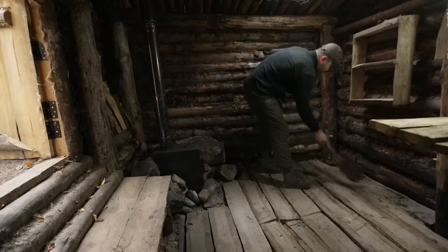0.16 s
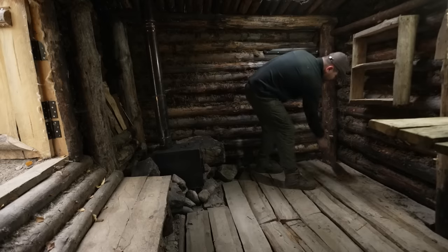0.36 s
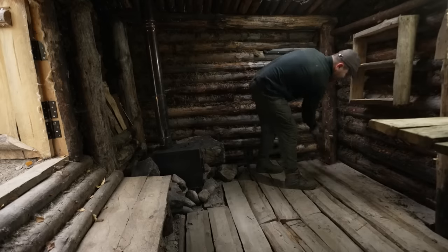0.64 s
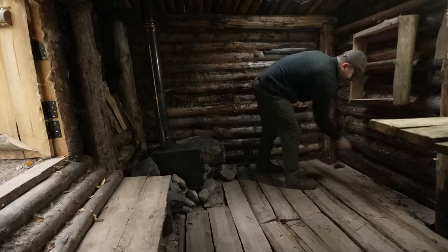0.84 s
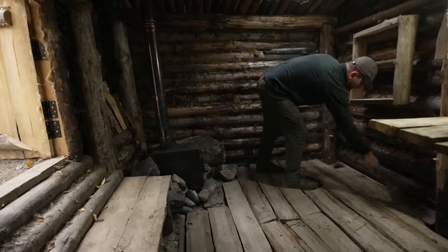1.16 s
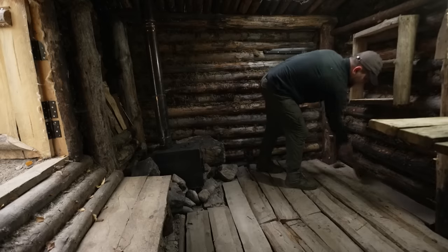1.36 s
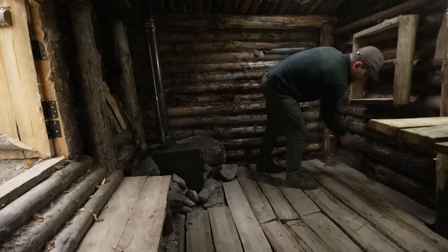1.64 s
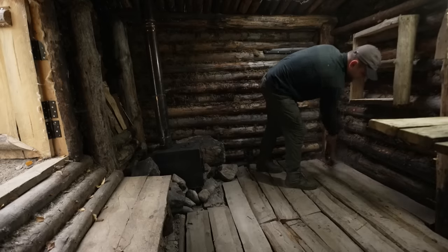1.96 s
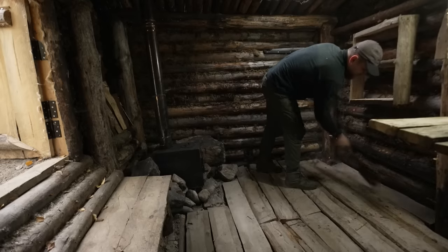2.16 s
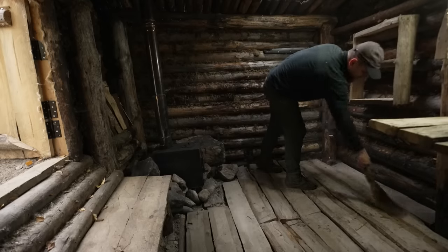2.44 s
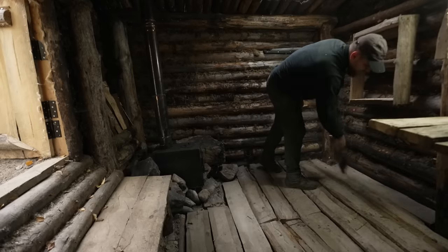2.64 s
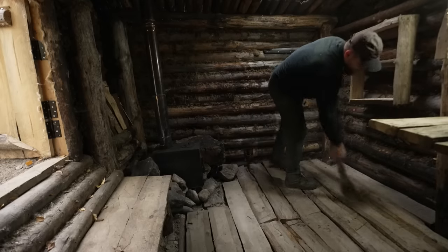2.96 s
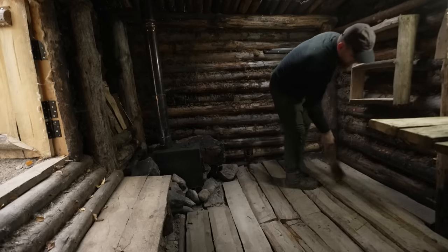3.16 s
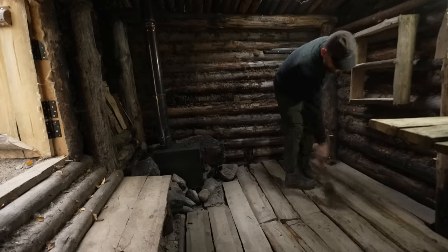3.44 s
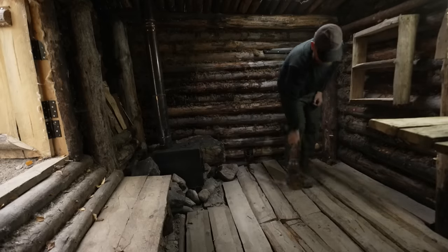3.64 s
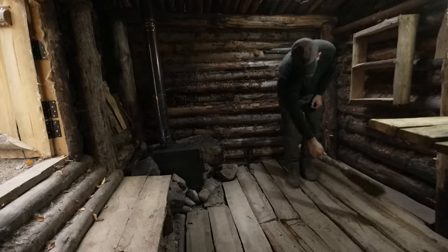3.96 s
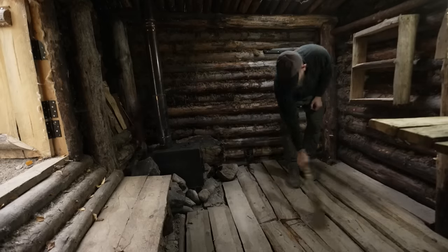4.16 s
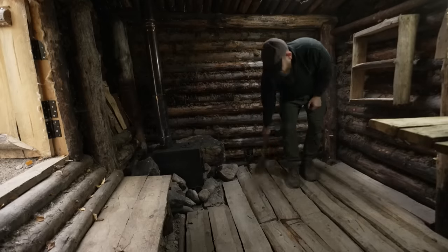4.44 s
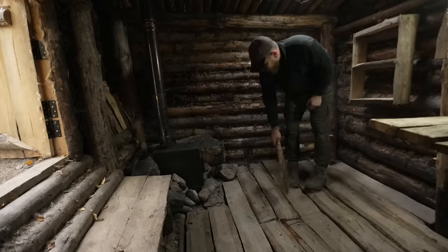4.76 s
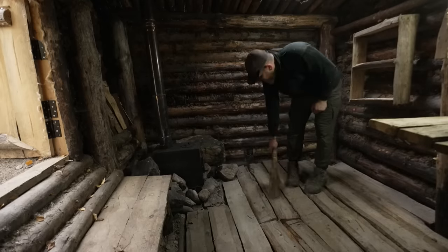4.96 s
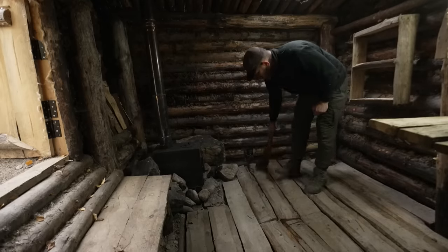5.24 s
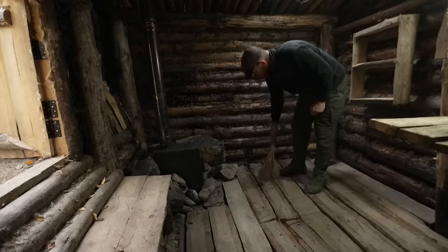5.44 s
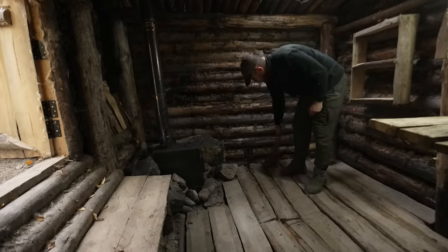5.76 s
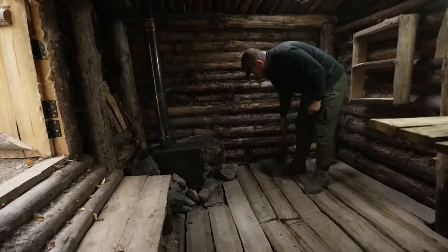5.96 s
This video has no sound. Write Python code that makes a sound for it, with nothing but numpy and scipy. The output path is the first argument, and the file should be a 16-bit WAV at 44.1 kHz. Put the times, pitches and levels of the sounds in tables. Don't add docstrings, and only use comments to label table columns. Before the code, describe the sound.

Close in a small log shelter, boots and a broom handle knock hollow floorboards, then a straw hand broom sweeps in brisk, irregular strokes. Straws crackle, stems snap, grit ticks and soles scuff between passes. A sharp cluster of cracks comes midway and a harder knock late. Low wind rumbles throughout over faint hiss; one close microphone, essentially mono, with a short woody room.

```python
import sys
import numpy as np
from scipy import signal
from scipy.fft import rfft, irfft
from scipy.io import wavfile

SR = 44100
rng = np.random.default_rng(int(sys.argv[2]) if len(sys.argv) > 2 else 0)


def rack_gain(trim_db):
    fader = np.asarray(trim_db, float)
    return 10 ** (fader / 20)


def log_audio(samples):
    frames = np.atleast_2d(samples).T
    limited = np.clip(frames, -1, 1)
    pcm = np.round(limited * 32767).astype(np.int16)
    wavfile.write(sys.argv[1], SR, pcm)


N = 268745


def evened(x):
    return x / np.sqrt(np.mean(x ** 2) + 1e-20)


def read(points, hz):
    f, value = np.transpose(points)
    return np.interp(np.log(hz + 1), np.log(f + 1), value)


def add(mix, s, sound):
    part = mix[round(s * SR):][:len(sound)]
    part += sound[:len(part)]


def coloured(points):
    hz = np.fft.rfftfreq(N, 1 / SR)
    spectrum = rfft(rng.standard_normal(N)) * rack_gain(read(points, hz))
    return evened(irfft(spectrum, N))


def wander(per_s):
    knots = rng.standard_normal(2000)
    return np.interp(np.arange(N) / SR * per_s, np.arange(2000), knots)


def slips(per_s, spread_db, size=30000):
    place, kept, big, sign = rng.random((4, size))
    height = rack_gain(spread_db * np.minimum(-np.log(big + 1e-9), 4)) * np.sign(sign - 0.5)
    height *= kept < per_s * N / SR / size
    return evened(np.bincount((place * N).astype(int), height, N))


def ring(modes, t):
    return sum(rack_gain(db - 60 * t / t60) * np.sin(2 * np.pi * hz * t) for hz, db, t60 in modes)


def broom(count=30):
    # [f/Hz, level/dB]
    straw_colour = [(380, -12), (600, -9.5), (1000, -5), (2000, -0.5), (4000, 2.5), (7000, 2), (11000, 2.5),
                    (13500, -2), (15500, -4)]
    # [f/Hz, level/dB, t60/s]
    plank_modes = [(340.7, 7, 0.067), (490, -1.5, 0.068), (560, -1.5, 0.044), (795, 4, 0.042),
                   (938, -9, 0.13)]
    boards_hz, stems_hz, tips_hz = 600, 2860, 9200
    s = np.arange(0, N, 64) / SR
    t, u = np.arange(N) / SR, np.arange(SR // 10) / SR
    parts_db = contact(s)
    stems_db = parts_db[1] - parts_db[2]
    places = np.log([boards_hz, stems_hz, tips_hz])
    tufts, judder_db = slips(900, 2.8), 0.72 * wander(110)

    plank = ring(plank_modes, u) * np.minimum(u / 0.0046, 1)
    push = rack_gain(np.interp(t, s, parts_db[0]) - 5.5 + 3.1 * wander(30)) * slips(1200, 2.0)
    out = signal.oaconvolve(push, plank / np.linalg.norm(plank))[:N]

    u = u[:1500]
    for hz in np.geomspace(380, 15700, count):
        shares = [np.interp(np.log(hz), places, one) for one in np.eye(3)]
        level_db = np.interp(t, s, shares @ parts_db) + read(straw_colour, hz)
        level_db += judder_db + 2.0 * wander(35)
        level_db -= np.interp(t, s, stems_db) * 0.52 * max(np.log(hz / tips_hz), 0)
        straw = ring([(hz, 0, 14 / hz)], u) * np.minimum(u * hz / 2.45, 1) ** 2
        drive = 0.82 * slips(3000, 2.4) + 0.5 * tufts
        out += signal.oaconvolve(rack_gain(level_db) * drive, straw / np.linalg.norm(straw))[:N]
    return rack_gain(-10.5) * out


def contact(s):
    # [landing t/s, push to full speed/s, run-out to the lift/s, tips level/dB, stems re tips/dB]
    strokes = [(0.412, 0.095, 0.04, -28.5, 0), (1.263, 0.21, 0.037, -32, 1.0),
               (1.501, 0.059, 0.076, -43.5, 1), (1.556, 0.088, 0.45, -51, 6),
               (1.62, 0.14, 0.034, -36.5, -15.5), (1.877, 0.045, 0.042, -31, -1),
               (2.467, 0.13, 0.03, -34.5, -4), (2.759, 0.052, 0.26, -64, 4), (2.979, 0.036, 0.058, -26, -6),
               (3.169, 0.034, 0.095, -43, -8.5), (3.336, 0.03, 0.067, -53, 3),
               (3.462, 0.037, 0.096, -32, -2), (3.607, 0.0098, 0.12, -41, 1.5),
               (3.773, 0.12, 0.15, -49, 0.5), (4.21, 0.21, 0.094, -30, -5.5),
               (4.549, 0.053, 0.098, -51.5, -0.5), (4.903, 0.068, 0.052, -60.5, 7),
               (5.024, 0.14, 0.13, -33, -7.5), (5.661, 0.17, 0.14, -35, -5), (5.994, 0.035, 0.074, -49, -2)]
    # [t/s, fade/s, tips level/dB, stems re tips/dB]
    flicks = [(.094, 0.043, -51.5, 2), (.254, .02, -48, 0), (.411, 0.077, -28, -10.5),
              (.571, .055, -36.5, -12), (.623, .17, -50.5, -3), (.693, 0.11, -43, -9),
              (.891, .069, -61, -16), (1.286, 0.067, -44.5, 15), (1.422, 0.12, -33.5, 10),
              (1.634, 0.049, -37, -17), (1.926, .032, -44, 16.5), (1.999, 0.12, -37, -15),
              (2.361, .025, -51.5, -1), (.381, 0.053, -50, -8), (1.227, .05, -50, 1),
              (2.097, 0.077, -50, -6), (2.158, .04, -56, -3), (2.178, .08, -58, 1), (2.21, .03, -57, -8),
              (.478, .06, -36, -8), (.51, .04, -38, -4), (3.49, 0.028, -40, -0.5), (2.462, 0.067, -48.5, 7),
              (2.716, 0.14, -43, -12.5), (2.987, 0.048, -47.5, 19.5), (3.073, 0.034, -29, -13),
              (3.514, .027, -33.5, 5), (3.599, 0.053, -30.5, 1.5), (4.064, 0.12, -47.5, -5),
              (4.707, 0.39, -55.5, 0), (4.877, 0.087, -55, -7), (5.163, .073, -45, -12),
              (5.54, .032, -56, 1), (5.7, .1, -37, -20)]
    # [t/s, fade/s, boards level/dB, stems re boards/dB]
    scuffs = [(.067, .056, -30, -18), (1.228, .15, -53, 3), (2.524, 0.064, -32, -16),
              (3.632, 0.15, -25.5, -10), (3.691, 0.026, -30, -8.5), (3.965, 0.18, -41, -5),
              (4.03, 0.11, -39, -12), (4.281, 0.16, -37.5, -22), (4.585, 0.28, -41.5, -13),
              (5.044, 0.21, -55, -18), (5.22, 0.2, -34.5, -20), (5.322, 0.012, -37.5, -3.5),
              (5.28, 0.17, -40.5, -4), (5.508, 0.31, -46, -8), (5.761, 0.52, -34.5, -16),
              (5.924, 0.18, -35.5, -7.5), (6.043, .058, -48, -19.5)]
    # [t/s, fade/s, boards level/dB, stems re boards/dB]
    skids = [
        (.204, 0.073, -29, -5),
        (1.236, 0.11, -32, -5.5),
        (3.3045, 0.082, -31.5, -9),
        (3.882, 0.027, -43, -5),
        (4.828, .055, -29.5, -12),
        (4.875, 0.048, -37, -18),
        (5.423, 0.069, -35, -7),
    ]
    # [level/dB] of boards, stems, tips
    rest_db = [-56.5, -64.5, -64]
    landing_db_per_s, lift_db_per_s = 487, 313
    touch_db_per_s, strike_db_per_s, fade_db = 814, 8000, 23
    boards_db_at_rest, boards_per_stems = -2, 0.67
    power = rack_gain(2 * np.array(rest_db))[:, None] * np.ones(len(s))

    for land, push, run_out, db, stems_db in strokes:
        top, lift = land + push, land + push + run_out
        soft_db, slow_db = 11 + 10 * push, 8.5 - 5.5 * run_out
        times = [land - 1, land, top, lift, lift + 1]
        drop_db = [soft_db + landing_db_per_s, soft_db, 0, slow_db, slow_db + lift_db_per_s]
        level_db = db - np.interp(s, times, drop_db)
        along = np.clip((s - top) / (lift - land), -1, 1)
        boards_db = boards_db_at_rest + boards_per_stems * stems_db - 4 * along
        parts_db = np.array([boards_db, stems_db - 4.5 * along, 0 * s])
        power = power + rack_gain(2 * (level_db + parts_db))

    touches = []
    for top, fade, db, stems_db in flicks:
        parts_db = [boards_db_at_rest + boards_per_stems * stems_db, stems_db, 0]
        touches.append((top, fade, db, touch_db_per_s, parts_db))
    for rows, rise in (scuffs, touch_db_per_s), (skids, strike_db_per_s):
        for top, fade, db, stems_db in rows:
            touches.append((top, fade, db, rise, [0, stems_db, stems_db - 5]))
    for top, fade, db, rise, parts_db in touches:
        level_db = db - np.maximum(rise * (top - s), fade_db * (s - top) / fade)
        power = power + rack_gain(2 * (level_db + np.array(parts_db)[:, None]))
    return 10 * np.log10(power)


def rubs():
    # [t/s, length/s, pitch f/Hz, second pitch f/Hz, level/dB]
    tuft_rubs = [(0.407, 0.02, 3850, 6600, -37), (0.492, 0.052, 3890, 3200, -43),
                 (0.682, .038, 3390, 3720, -55.5), (1.234, 0.015, 1380, 2980, -37.5),
                 (1.27, 0.04, 3550, 3000, -41.5), (1.42, 0.05, 2640, 3800, -41),
                 (1.895, 0.05, 3680, 4600, -41), (2.984, 0.022, 1400, 1700, -35.5),
                 (2.448, 0.059, 1210, 2380, -46.5), (2.978, .036, 1620, 2300, -35),
                 (2.97, 0.045, 4400, 4540, -43), (2.983, 0.028, 4410, 4600, -33.5),
                 (3.508, 0.017, 1250, 2680, -37.5), (3.493, 0.03, 3850, 5700, -35.5),
                 (3.88, 0.01, 1635, 3450, -43.5), (4.657, 0.012, 2875, 5100, -46),
                 (5.508, 0.0055, 1488, 2200, -49), (5.691, 0.032, 3090, 4030, -52)]
    # [t/s, length/s, pitch f/Hz, second pitch f/Hz, level/dB]
    drags = [(.064, 0.023, 880, 1300, -40), (.067, 0.024, 1100, 1500, -40), (0.258, 0.02, 300, 600, -35),
             (0.444, 0.14, 1000, 2200, -47.5), (1.339, 0.097, 330, 590, -44),
             (3.301, 0.024, 820, 1850, -39), (3.355, 0.03, 450, 560, -45.5), (3.595, 0.021, 490, 364, -41),
             (3.665, 0.09, 547, 775, -41), (4.015, 0.053, 600, 1330, -48.5), (4.466, 0.04, 780, 1500, -51),
             (5.425, 0.022, 560, 950, -40), (4.266, 0.06, 824, 600, -47.5), (5.798, 0.036, 1250, 1790, -44),
             (5.895, 0.074, 964, 1250, -44.5)]
    out, u = np.zeros(N), np.arange(SR // 10) / SR
    chance = rng.standard_normal((len(tuft_rubs + drags), 2, len(u)))
    for (s, length, hz, second_hz, db), (grit, spread) in zip(tuft_rubs + drags, chance):
        swell = np.sin(np.pi * np.clip(u / length, 0, 1) ** 0.43)
        drive = grit * rack_gain(8.2 * spread) * swell
        body = ring([(hz, 0, 0.045 + 9 / hz),
                     (1.045 * hz, -5, 0.026 + 9 / hz),
                     (second_hz, -3, 0.021 + 9 / second_hz),
                     (0.95 * second_hz, -7, 0.026 + 9 / second_hz)], u)
        sound = signal.fftconvolve(drive, body)
        add(out, s, rack_gain(db) * np.sqrt(length * SR) * sound / np.linalg.norm(sound))
    return out


def snaps():
    # [t/s, peak level/dB, centre f/Hz]
    straw_snaps = [(.1536, -38, 3050), (0.2035, -33.5, 2500), (0.252, -28.5, 6870), (0.637, -33, 3200),
                   (.7394, -42, 5430), (0.813, -40, 3720), (1.076, -39.5, 2660), (1.4254, -35, 3480),
                   (1.4465, -25, 2660), (1.716, -25.5, 6040), (2.091, -27, 5600), (2.356, -41, 5500),
                   (2.4563, -28.5, 4410), (3.237, -33.5, 3200), (3.295, -41, 2860), (3.5148, -19, 4170),
                   (3.5952, -18.5, 4660), (3.8835, -32, 3200), (4.3231, -23, 4000), (4.3345, -33, 5500),
                   (4.6562, -31, 4500), (4.706, -34.5, 8000), (4.8285, -38, 6000), (4.874, -32, 7000),
                   (4.8825, -37, 7640), (5.16, -24, 6650), (5.427, -53, 3630), (5.5764, -39, 6240)]
    # [t/s, peak level/dB, centre f/Hz]
    fine_grit = [(1.9938, -32, 9000), (2.0053, -23, 7000), (2.172, -44, 12000), (2.0262, -28, 12000),
                 (2.009, -25, 10000), (2.2064, -49, 8890), (2.4294, -47, 11500), (2.7064, -39, 12600),
                 (2.7142, -31, 11500), (2.7214, -35, 9560), (2.809, -36, 13000), (2.834, -38, 9200),
                 (3.0294, -31, 8000), (3.072, -31, 7150), (3.187, -25.5, 8000), (3.163, -38, 13000),
                 (3.178, -32, 11000), (3.2614, -32, 9520), (3.7244, -26.5, 9740), (3.8202, -36, 7690),
                 (4.3774, -23, 8000), (5.4, -38, 10500), (5.5348, -41, 8650)]
    out, t = np.zeros(N), np.arange(SR // 10) / SR
    chance = rng.standard_normal((len(straw_snaps + fine_grit), len(t)))
    for (s, db, hz), grit in zip(straw_snaps + fine_grit, chance):
        crack = np.sign(grit) * rack_gain(-60 * t / 0.0026)
        spray = rack_gain(-7.5 - 60 * t / 0.063) * grit
        colour = signal.butter(2, [0.44 * hz, min(1.52 * hz, 17000)], "band", fs=SR)
        sound = signal.lfilter(*colour, crack + spray)
        add(out, s, rack_gain(db) * sound / abs(sound).max())
    return out


def breaks():
    # [t/s, peak level/dB, lowest f/Hz, ring f/Hz, ring re crack/dB]
    stem_breaks = [(2.0907, -25, 3700, 3860, -7), (2.0912, -27, 8000, 12500, -3),
                   (.407, -21, 2500, 3840, 0), (.4105, -28, 3000, 4400, -2), (1.2345, -30, 1100, 3000, 0),
                   (1.2365, -27.5, 790, 2200, -2), (3.5952, -20, 5000, 7400, -8),
                   (3.509, -23, 2800, 5800, -2), (2.1715, -32, 9700, 12400, -12),
                   (2.1797, -46, 1500, 4300, -8), (2.7142, -33, 8800, 11500, -10.5),
                   (3.4882, -27, 2900, 4000, -6), (3.5152, -14.5, 2210, 3980, -2),
                   (3.5955, -14, 1400, 5000, -10), (4.3243, -22, 2800, 4600, -8),
                   (4.387, -22, 3000, 7000, -8), (4.7056, -39, 2700, 3600, -4),
                   (4.8738, -35, 3500, 4100, -16), (4.6563, -25, 1400, 4600, -8),
                   (4.8815, -38, 3800, 8700, -6), (4.3243, -31, 560, 1500, -6),
                   (4.379, -28, 1200, 2400, -6), (.3045, -46, 9000, 12500, -6), (1.2385, -34, 360, 630, 0),
                   (1.4094, -22, 1300, 2520, -4), (1.4255, -18, 1700, 2400, -6),
                   (1.435, -21, 1400, 2500, -6), (1.4485, -18, 1500, 2400, -6),
                   (1.4585, -23, 1500, 2850, -6), (.4795, -21, 3700, 7000, -8),
                   (.4915, -26, 2500, 4000, -6), (.5115, -25, 2500, 6400, -6), (.5175, -26, 1300, 3700, -6),
                   (5.261, -38, 500, 850, 0), (5.312, -34, 270, 461, 2), (5.4255, -33.5, 440, 670, 2),
                   (3.6005, -25.5, 320, 480, 2), (3.691, -32, 430, 770, 0), (3.666, -28.5, 570, 960, 0),
                   (3.0003, -20, 1700, 2300, -4), (2.9905, -19.5, 1200, 4400, -4),
                   (2.996, -20, 1300, 4350, -3)]
    # [pitch ratio, level/dB, t60/cycles]
    stem_modes = [(1.01, 13, 39), (0.46, 1, 12), (.66, -11, 15), (1.1, 1.5, 27), (1.2, -10, 19)]
    out, t = np.zeros(N), np.arange(2000) / SR
    clicks = np.zeros(len(t))
    clicks[[0, 9, 23]] = 1, -0.6, 0.35
    for s, db, low_hz, hz, ring_db in stem_breaks:
        modes = [(hz * ratio, mode_db, cycles / (hz * ratio)) for ratio, mode_db, cycles in stem_modes]
        crack = clicks + rack_gain(ring_db - 3) * ring(modes, t)
        sound = signal.lfilter(*signal.butter(3, low_hz, "high", fs=SR), crack)
        add(out, s, rack_gain(db) * sound / abs(sound).max())
    return out


def pebble():
    # [f/Hz, level/dB, t60/s]
    stone_modes = [(1874, -4, 0.13), (2875, -9, 0.078), (4340, 1, 0.097), (6870, -8, 0.066),
                   (7590, -7, 0.048), (8096, -8, 0.091), (9636, -14, 0.091), (10400, -22, 0.097)]
    # [t/s, level/dB, share of the full ring time]
    stone_hits = [
        (4.6561, -29, .15),
        (4.6578, -38, .7),
    ]
    out, t = np.zeros(N), np.arange(8000) / SR
    for s, db, share in stone_hits:
        modes = [(hz, mode_db, share * t60) for hz, mode_db, t60 in stone_modes]
        add(out, s, rack_gain(db) * ring(modes, t))
    return out


def clear_notes():
    # [t/s, level/dB, pitch f/Hz, swell/s, t60/s]
    sung = [(4.398, -32.5, 484, 0.021, 0.097), (4.405, -40, 818, 0.011, .06), (1.293, -29, 2980, .005, .03),
            (1.304, -32, 3400, .003, 0.033), (1.276, -34, 2100, 0.0045, .05), (2.986, -21, 1570, .005, .03),
            (2.994, -22, 1600, 0.0034, .03), (3.0, -28, 2300, .004, .03), (2.978, -26, 1500, .004, .03),
            (3.597, -27, 490, .003, .08), (3.508, -30, 1270, .005, .05), (3.695, -31, 520, .006, .07),
            (.062, -36, 937, .006, .04), (.064, -35, 544, .006, .05), (.068, -33, 1100, .006, .04),
            (.406, -28, 3850, .004, .03), (.412, -33, 4550, .004, .04), (.429, -33, 3400, .004, .04),
            (.496, -29, 3150, .004, .03), (.492, -30, 3900, .004, .04), (.508, -31, 3950, .005, .03),
            (.504, -32, 1300, .005, .04), (1.242, -33, 1450, .004, .04), (1.28, -33, 3550, .006, .04),
            (1.395, -33, 1600, .008, .05), (1.408, -29, 2850, .004, .025), (1.413, -32, 991, .008, .05),
            (1.432, -29, 2420, .006, .04), (1.921, -29, 3700, .006, .04), (1.924, -29, 2300, .004, .03),
            (1.936, -31, 4100, .004, .03), (2.957, -40, 1600, .005, .04), (3.506, -33, 2700, .006, .04),
            (3.663, -32, 850, .005, .04), (3.335, -33, 240, .005, .08), (3.302, -38, 1400, .004, .07),
            (5.427, -32, 590, .005, .05), (5.444, -36, 580, .004, .05), (4.83, -42, 1050, .004, .06)]
    out, t = np.zeros(N), np.arange(8000) / SR
    for s, db, hz, swell, t60 in sung:
        shape = np.minimum(t / swell, 1) ** 2 * rack_gain(-60 * np.maximum(t - swell, 0) / t60)
        add(out, s, rack_gain(db) * shape * np.sin(2 * np.pi * hz * t))
    return out


def knocks():
    # [t/s, peak level/dB, plank f/Hz, joists re plank/dB, hardness (overtones re plank)/dB]
    blows = [(0.035, -34, 315, -16, -5), (0.2018, -19, 337, -17, -26), (.211, -23, 149, -5, -2),
             (.257, -15.5, 180, -13, -37), (0.2576, -21.5, 340, -17, -30), (.264, -17, 170, -6, -30),
             (0.272, -20, 125, -3.5, -35), (1.235, -46, 157, -11, 14), (3.305, -34.5, 155, -9, 18.5),
             (3.317, -30.5, 396, -3, -12), (3.335, -27.5, 350, -2, -20), (4.02, -38, 286, -10, -15),
             (5.51, -42, 195, -5, -15), (3.955, -38, 205, -0.5, -17), (4.825, -32.5, 181, -1.5, -13),
             (4.87, -35.5, 156, 2.5, -12), (5.42, -21.5, 350, -8.5, -18)]
    # [f/Hz, level/dB, t60/s]
    joist_modes = [(66.6, -1, 0.22), (89.8, 9.5, 0.074), (117.3, -1.5, 0.12)]
    # [f/Hz, level/dB, t60/s]
    upper_modes = [(490, 8.5, 0.072), (565, -44, 0.033), (600, 3, 0.081)]
    # [f/Hz, level/dB, t60/s]
    clack_modes = [(850, 6, 0.046), (1000, -7, 0.066), (1250, 8, 0.024), (1680, -29, .05),
                   (2190, -21, 0.041)]
    out, t = np.zeros(N), np.arange(12000) / SR
    for s, db, hz, boom_db, hard_db in blows:
        boom = rack_gain(boom_db - 1.5) * ring(joist_modes, t) * np.minimum(t / 0.0098, 1)
        plank = ring([(hz, 0, 0.05)], t) + rack_gain(0.64 * hard_db - 18.5) * ring(upper_modes, t)
        plank = plank * np.minimum(t / 0.0024, 1)
        clack = rack_gain(hard_db - 24.0) * ring(clack_modes, t) * np.minimum(t / 0.00097, 1)
        add(out, s + 0.00123, -rack_gain(db + 3.0) * (boom + plank + clack))
    return out


def hut(x):
    # [f/Hz, t60/s]
    decay = [(200, 0.13), (1000, 0.14), (4000, 0.078), (12000, 0.087)]
    taps = np.zeros(SR // 2)
    at = np.arange(140, len(taps) - 20, 20)
    taps[at + rng.integers(0, 20, len(at))] = rng.choice([-1., 1.], len(at))
    hz, t, z = signal.stft(taps, SR, nperseg=128)
    fade = rack_gain(-60 * t / read(decay, hz)[:, None])
    tail = signal.istft(z * fade, SR, nperseg=128)[1]
    return signal.fftconvolve(x, tail / np.linalg.norm(tail))[:N]


def wind():
    # [t/s, boom level/dB]
    gusts = [(0.0, -46), (0.22, -41.5), (0.92, -47), (1.36, -45), (2.2, -43), (2.59, -45.5), (3.24, -43.5),
             (3.7, -44.5), (3.85, -43.5), (4.48, -43), (4.8, -41.5), (5.05, -44.5), (5.27, -42),
             (5.34, -40.5), (5.75, -45), (6.09, -42)]
    # [f/Hz, density/dB per Hz]
    rumble = [(8.8, -30), (15, 1), (28, -3), (50, 0), (65, 3.5), (76, -5), (88, -11), (103, -6), (116, -3),
              (145, -17), (166, -11), (189, -18.5), (211, -15.5), (258, -33), (300, -29), (390, -45),
              (660, -120)]
    s, db = np.transpose(gusts)
    level_db = np.interp(np.arange(N) / SR, s, db) + 1.5 + 2.0 * wander(9)
    return rack_gain(level_db) * coloured(rumble)


def hiss():
    # [f/Hz, level/dB]
    hiss_colour = [(120, -36), (200, 2.5), (422, 0.5), (586, 2), (1380, -4), (1950, -6), (2220, -10),
                   (7520, -16), (8870, -29), (15600, -16)]
    return rack_gain(-55.5) * coloured(hiss_colour)


def scene():
    sweep = broom() + rubs()
    hits = snaps() + knocks() + breaks() + pebble() + clear_notes()
    room = rack_gain(-13.0) * hut(sweep) + rack_gain(-12.0) * hut(hits)
    mono = sweep + hits + room + wind() + hiss()
    return np.array([mono, mono])


def top_cut(x):
    return signal.sosfilt(signal.butter(12, 16650, fs=SR, output="sos"), x)


def record(dry):
    grain = np.diff(dry[0], n=2, prepend=[0, 0]) * np.sign(rng.standard_normal(N))
    grain = rack_gain(-31) * signal.lfilter(*signal.butter(2, 6000, "high", fs=SR), grain)
    edge = signal.firwin(1023, 15900, window=("kaiser", 9), fs=SR)
    mix = signal.oaconvolve(dry + [grain, -grain], edge[None], "same")
    return top_cut(mix)


dry = scene()
out = record(dry)
log_audio(out)
```